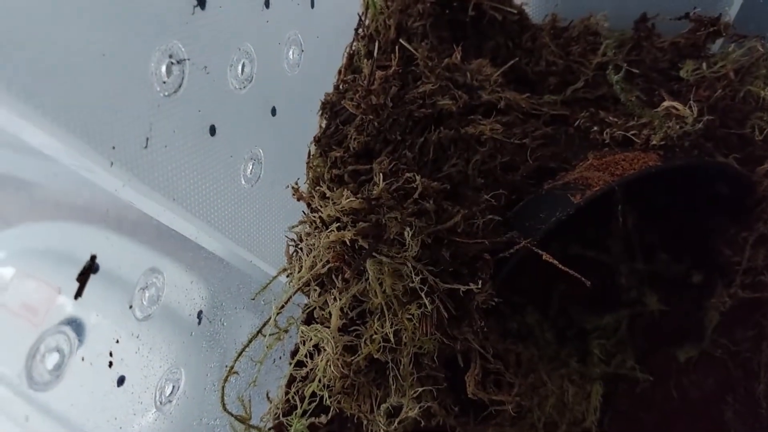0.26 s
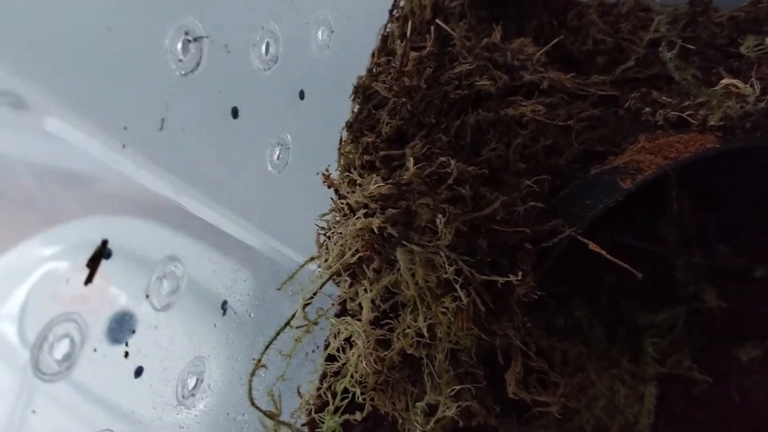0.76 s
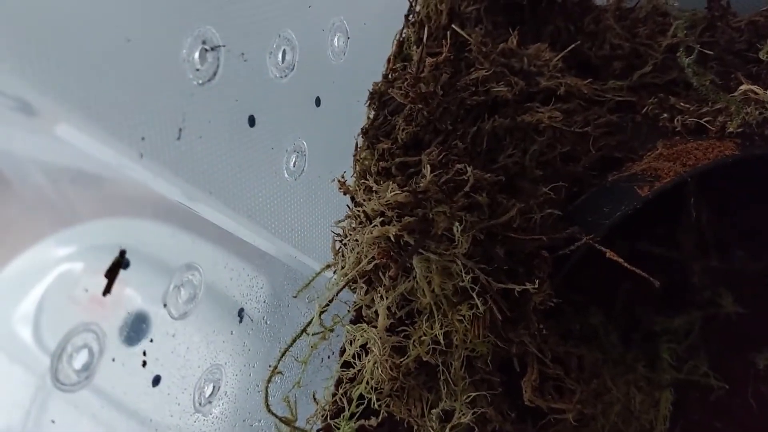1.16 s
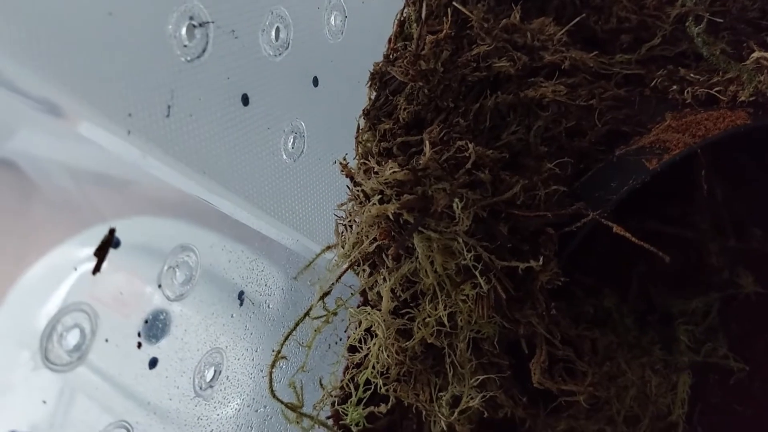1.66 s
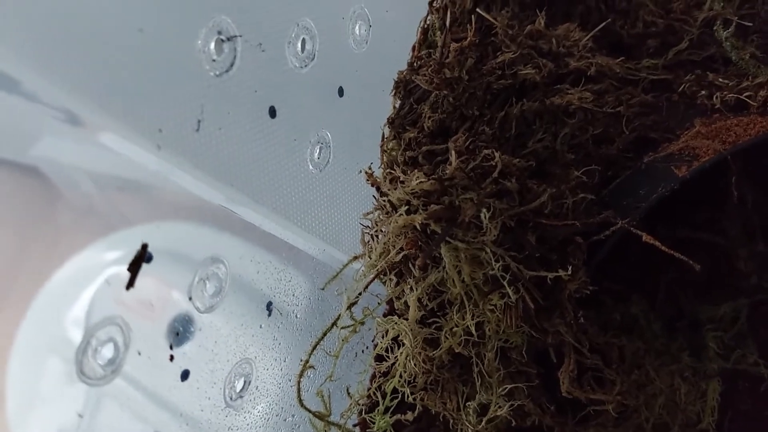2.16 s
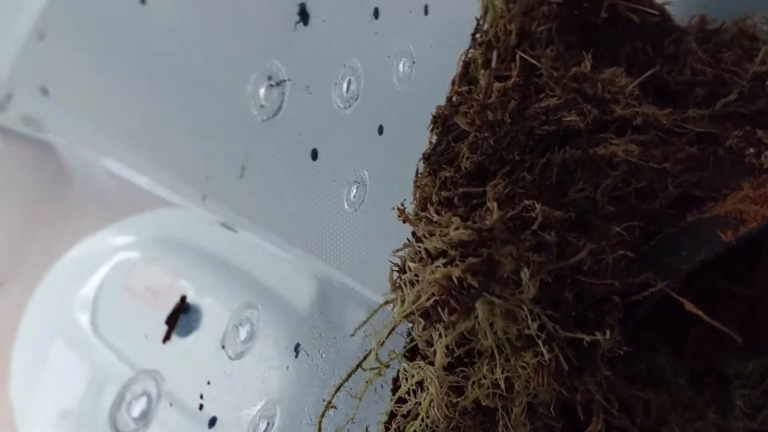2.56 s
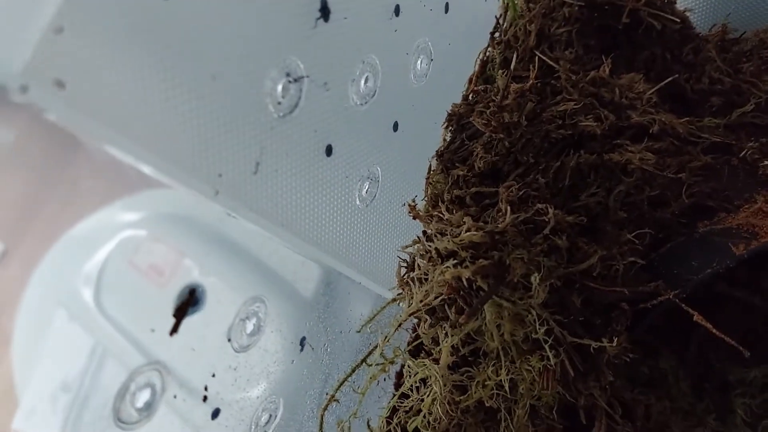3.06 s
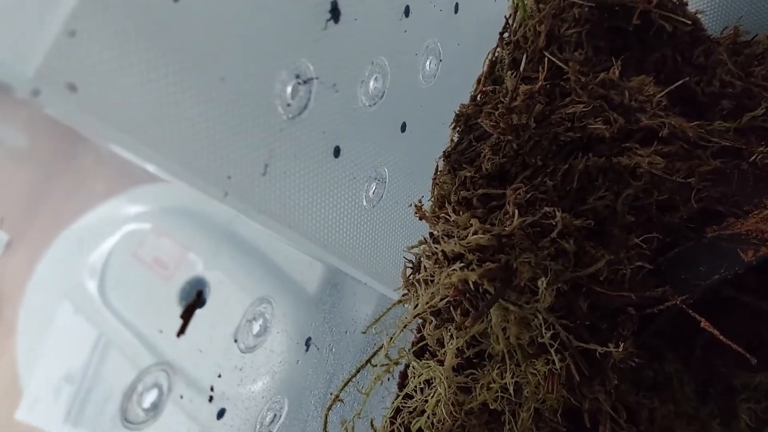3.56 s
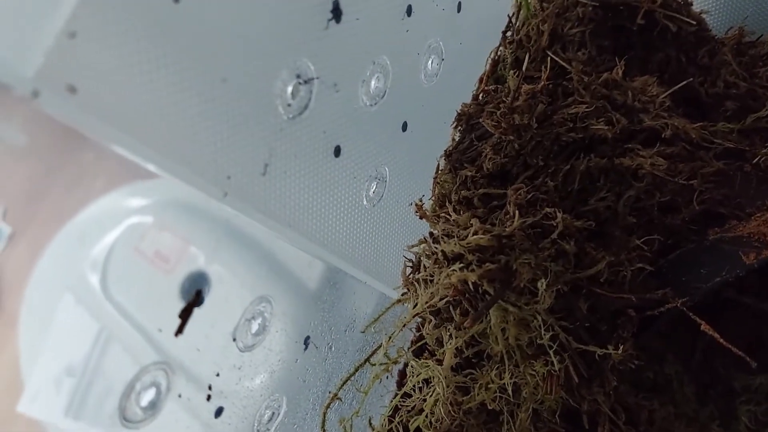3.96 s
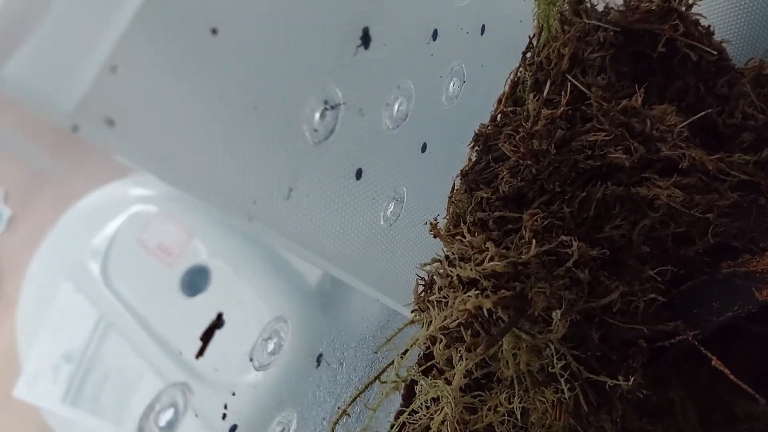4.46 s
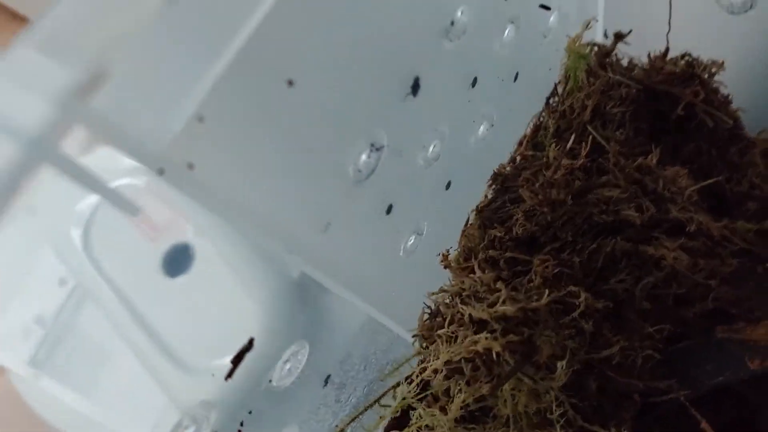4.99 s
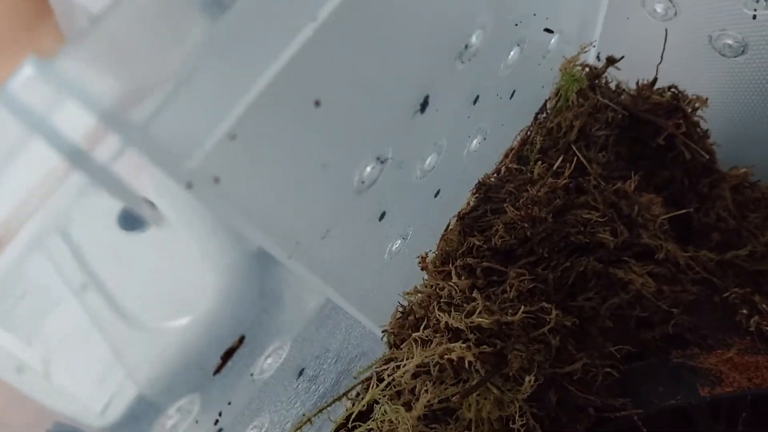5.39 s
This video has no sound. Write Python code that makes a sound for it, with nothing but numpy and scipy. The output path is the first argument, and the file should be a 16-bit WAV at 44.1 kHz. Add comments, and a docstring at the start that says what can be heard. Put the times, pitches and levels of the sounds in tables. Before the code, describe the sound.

A hand sprayer mists moss beside a close stereo microphone in a small plastic enclosure indoors. Short, breathy hisses repeat to the end, each edged by snappy spits, with a soft pump thump beneath. A brief stiff plastic rub and low knocks interrupt the first half; afterwards the spraying runs steadily, shifting from slightly right to left of centre, with patter fuller and the tub quiet.

```python
"""Quick, hissing pulls of a trigger bottle, nearly three a second, mist moss in a plastic tub close to the microphone.
Each pull spits, thumps in the pump, swells to a hiss of droplets, spits as the valve shuts and sucks water back.
Jet and droplets are shaped noise driven by pump pressure; pump, tub and a rubbed panel are struck modes.
The tub is bumped a few times and booms; its near walls comb the hiss, differently for each aim of the nozzle."""
import sys
import numpy as np
from scipy import signal
from scipy.fft import rfft, irfft
from scipy.io import wavfile

SR = 44100
rng = np.random.default_rng(int(sys.argv[2]) if len(sys.argv) > 2 else 0)


def int16_out(signal):
    """Quantize to a 16-bit WAV file."""
    q = np.round(np.clip(np.atleast_2d(signal).T, -1, 1) * 32767)
    wavfile.write(sys.argv[1], SR, q.astype(np.int16))


N = 248264
TIME = np.arange(N) / SR

# trigger pulls: (time [s], let go [s], mist level [dB], patter on the moss over the mist [dB],
#                 second spit level [dB], pump thump level [dB], hollow that the patter rings [Hz])
PULLS = [(0.0375, 0.26, -36, -2.5, -30, -52, 1327), (0.6229, .839, -35.5, -4.5, -29, -56, 1300),
         (1.081, 1.317, -35.5, -1.5, -32.5, -64, 2730), (1.474, 1.69, -33.5, -0.8, -25, -32, 2670),
         (1.826, 2.039, -35, 1, -43, -52, 2680), (2.1507, 2.3512, -35.5, -0.4, -42, -51.5, 2480),
         (2.7431, 2.9735, -35.5, 0, -29, -52, 2750), (3.108, 3.3186, -33.5, 3, -53, -40.5, 1960),
         (3.4465, 3.6626, -34, 2, -43.5, -39.5, 2510), (3.8148, 4.0283, -33.5, 1.5, -43, -39, 1960),
         (4.161, 4.3654, -33, 1, -43.5, -38, 2090), (4.4672, 4.668, -34, 0.2, -47, -40, 2300),
         (4.7968, 4.993, -35, -1.1, -57, -40, 2020), (5.1366, 5.3458, -35, 0.9, -29, -41.5, 1750),
         (5.613, 5.82, -37.5, -2.5, -47.5, -49, 2010)]
# aims of the nozzle: (start [s], left minus right [dB], hollow level [dB], closing spit level [dB],
#                      suction level [dB])
AIMS = [(0, -.5, -5.5, -36.5, -68), (2.6, 3, -10, -32.5, -59), (4.1, 3.5, -6.5, -31.5, -62.5)]


def undb(db):
    """Decibels to gain."""
    return 10 ** (np.asarray(db) / 20)


def pan(db):
    """Gains of the two channels for a left minus right level."""
    return undb(np.array([[db], [-db]]) / 2)


def add(out, s, sound):
    """Mix a sound in from time s."""
    start = max(int(s * SR), 0)
    part = sound[..., :max(N - start, 0)]
    out[:, start:start + part.shape[-1]] += part


def colour(x, points):
    """Filter by a (Hz, dB) spectrum, keeping the power of white noise."""
    hz, db = np.transpose(points)
    f = np.fft.rfftfreq(x.shape[-1], 1 / SR) + 1
    gain = undb(np.interp(np.log(f), np.log(hz), db))
    gain = gain * np.minimum(f / hz[0], 1) ** 2  # falls away under the first point
    return irfft(rfft(x) * gain / np.sqrt(np.mean(gain ** 2)), x.shape[-1])


def lowpass(x, hz, order=2):
    """The part of a sound under hz, without delay."""
    sos = signal.butter(order, min(hz, .45 * SR), fs=SR, output="sos")
    return signal.sosfiltfilt(sos, x)


def highpass(x, hz):
    """The part of a sound over hz."""
    return signal.sosfilt(signal.butter(2, hz, "highpass", fs=SR, output="sos"), x)


def resonate(x, hz, width_hz):
    """One resonance, gain 1 at its centre."""
    return signal.lfilter(*signal.iirpeak(hz, hz / width_hz, fs=SR), x)


def fade(t, t60):
    """Exponential decay by 60 dB in t60 seconds."""
    return np.exp(-np.log(1000) * t / t60)


def at_ports(pair, alike_hz):
    """Two unrelated sounds become left and right: alike in the bass, unrelated in the treble."""
    f = np.fft.rfftfreq(pair.shape[-1], 1 / SR)
    alike = 1 / (1 + f / alike_hz)
    mid, side = irfft(rfft(pair) * np.sqrt([1 + alike, 1 - alike]), pair.shape[-1])
    return np.array([mid + side, mid - side]) / np.sqrt(2)


def from_right(x):
    """A source on the right reaches the left port late."""
    port_lag_s = .00033
    t = TIME[:x.shape[-1]]
    return np.array([np.interp(t - port_lag_s, t, x[0]), x[1]])


def noise(points, size, alike_hz=900):
    """Stereo turbulence of a given spectrum."""
    return colour(at_ports(rng.standard_normal((2, size)), alike_hz), points)


def burst(points, rise_s, t60):
    """A puff of noise that rises linearly while it dies away."""
    t = TIME[:SR // 2]
    return noise(points, len(t)) * np.minimum(t / rise_s, 1) * fade(t, t60)


def ring(modes, contact_ms, build_cycles=0.76, lowest_hz=48):
    """Modes struck by a half-sine push; a longer contact is duller, and low modes take longer to build up."""
    t = TIME[:SR]
    push = np.sin(np.pi * np.minimum(t[:SR // 50] * 1000 / contact_ms, 1))
    body = np.zeros(len(t))
    for hz, db, t60 in modes:
        build = 1 - np.exp(-t * hz / build_cycles)
        body += undb(db) * np.sin(2 * np.pi * hz * t) * fade(t, t60) * build
    body = signal.fftconvolve(body, push / push.sum())[:SR]
    return highpass(body, lowest_hz)


def near_walls(x, walls):
    """Each port hears the sound with its own few very early reflections."""
    f = np.fft.rfftfreq(x.shape[-1], 1 / SR)
    walls = np.array(walls)
    lag_s, share = walls[:, 0::2, None] / 1000, walls[:, 1::2, None]
    comb = 1 + np.sum(share * np.exp(-2j * np.pi * f * lag_s), axis=0)
    return irfft(rfft(x) * comb, x.shape[-1])


def aim_at(s):
    """Which aim the nozzle has at time s."""
    return sum(s >= row[0] for row in AIMS[1:])


def spit(tail_db=-12, tail_t60=0.055):
    """A drop bursts from the nozzle: a sharp snap and a short fizz."""
    # spectrum: (frequency [Hz], level [dB])
    spit_spectrum = [(300, -13), (800, -7.5), (1400, -13.5), (2100, -8), (2400, -12.5), (2800, -4),
                     (3600, -11), (5500, -8.5), (7300, -8), (8600, -2), (11300, 5), (13000, 2.5),
                     (15500, 1.5), (16800, -9)]
    t = TIME[:SR // 10]
    decay = fade(t, t60=.016) + undb(tail_db) * fade(t, tail_t60)
    return noise(spit_spectrum, len(t)) * np.minimum(t / .002, 1) * decay


def quiet_room(level_db=-70.5):
    """Steady room noise, strongest in the bass."""
    # spectrum: (frequency [Hz], level [dB])
    room_spectrum = [(25, -11), (50, 5.5), (85, -2.5), (125, -0.5), (200, -12), (400, -18), (900, -23.5),
                     (2500, -24.5), (6000, -24.5), (9000, -23), (15500, -26.5)]
    return undb(level_db) * noise(room_spectrum, N, alike_hz=695)


def wet_moss(ticks_per_s=14, tick_db=-70, scatter_db=3):
    """Tiny ticks at random times as water settles in the moss."""
    out = np.zeros((2, N))
    times_s = np.cumsum(rng.exponential(1 / ticks_per_s, 100))
    for s, size in zip(times_s, rng.standard_normal(100)):
        add(out, s, undb(tick_db + scatter_db * size) * spit())
    return out


def rub(level_db=-46, slips_per_s=600, scatter_db=3, rustle_db=-8):
    """Something rubs along the wall: dense uneven slips ring a stiff panel, with a dry rustle."""
    # stiff panel modes: (frequency [Hz], level [dB], t60 [s])
    panel_modes = [(520, -2, 0.069), (602, -2, 0.059), (649, 1, 0.08), (1083, -11, 0.027),
                   (1223, -7.5, 0.059), (1650, -6, 0.027), (2410, -18, 0.0076)]
    # rustle spectrum: (frequency [Hz], level [dB])
    rustle_spectrum = [(400, 0), (1200, 4), (2500, -5), (4000, -11), (7000, -20.5), (15000, -23)]
    start_s, swell_s, hold_s, lift_t60, swell_db = .335, 0.16, 0.069, 0.12, 27.5
    slips = rng.random((2, N)) < slips_per_s / SR
    slips = slips * undb(scatter_db * rng.standard_normal((2, N)))
    slips = at_ports(slips - slips.mean(), alike_hz=2500)
    strike = ring(panel_modes, contact_ms=0.12, lowest_hz=350)
    panel = signal.fftconvolve(slips, strike[None], axes=1)[:, :N]
    sound = panel / panel.std() + undb(rustle_db) * noise(rustle_spectrum, N)
    # presses harder, holds and lifts off
    t = TIME - start_s
    swell = undb(swell_db * np.minimum(t / swell_s - 1, 0)) * (t > 0)
    lift = fade(np.maximum(t - swell_s - hold_s, 0), lift_t60)
    return from_right(sound) * undb(level_db) * swell * lift


def tub(rattle_db=-13):
    """Each bump booms in the thin walls, with a dull crack and a short rustle; the bottle in the hand ticks."""
    # bumps: (time [s], blow level [dB], contact time [ms], crack level [dB])
    bumps = [(.338, -25.5, 3.24, -44), (.353, -24.5, 5.7, -72), (.423, -31, 1.2, -73),
             (.440, -27.5, 1.9, -60.5), (0.477, -25.5, 2.7, -50), (0.49, -22.5, 2.6, -62),
             (0.525, -25, .7, -38), (1.386, -13, 4.43, -30), (1.446, -16.5, 3.24, -50.5),
             (1.48, -7.5, 4.9, -26.5), (1.517, -27, 2.2, -58.5), (1.584, -25.5, 2.9, -71),
             (1.676, -41.5, 3.2, -68), (2.391, -19.5, 2.8, -32), (2.405, -15, 6.4, -60),
             (2.441, -25.5, 4.5, -46), (2.485, -26.5, 3.7, -59)]
    # wall modes: (frequency [Hz], level [dB], t60 [s])
    wall_modes = [(62.7, -1, 0.17), (94.4, 4, 0.075), (117.8, 0.5, 0.13), (136.1, 2, 0.16),
                  (168.5, 0, 0.069), (222.3, -1, 0.11), (242.3, -3.5, 0.17), (307, -11, 0.14),
                  (397, -20.5, 0.17), (548, -12.5, 0.082), (698, -21, 0.21)]
    # small plastic ticks from the bottle: (time [s], level [dB], t60 [s])
    bottle_ticks = [(.019, -69, 0.013), (1.0, -59, 0.01), (2.585, -57, 0.012), (2.65, -46.5, 0.1),
                    (2.66, -49, 0.055), (2.70, -66.5, 0.33)]
    # spectra: (frequency [Hz], level [dB])
    crack_spectrum = [(150, 8), (600, -3.5), (1000, -11), (2000, -14), (3500, -21), (6000, -28.5),
                      (15000, -40.5)]
    tick_spectrum = [(300, -29), (1200, -11.5), (2500, -2), (4000, 2.5), (7000, -10.5), (11000, -11),
                     (15500, -19)]
    out = np.zeros((2, N))
    for s, db, contact_ms, crack_db in bumps:
        lowest_hz = np.interp(db, [-26, -20], [80, 48])  # only a hard blow bends the whole wall
        add(out, s, undb(db) * ring(wall_modes, contact_ms, lowest_hz=lowest_hz))
        crack = burst(crack_spectrum, rise_s=0.001, t60=0.055)
        rustle = burst(crack_spectrum, rise_s=0.0049, t60=0.42)
        add(out, s, undb(crack_db) * (crack + undb(rattle_db) * rustle))
    boom = lowpass(out, hz=100)
    out = from_right(boom * pan(db=-5.0) + (out - boom) * pan(db=-2.5))
    for s, db, t60 in bottle_ticks:
        add(out, s, undb(db) * burst(tick_spectrum, rise_s=0.00061, t60=t60))
    return out


def pump(rebound_s=0.025, rebound_db=-7, flow_db=-16):
    """The piston meets the water and rebounds; the bottle hums on while the water flows."""
    # pump and bottle modes: (frequency [Hz], level [dB], t60 [s])
    pump_modes = [(143.3, -9, 0.36), (174.3, -6.5, 0.28), (219, 1, 0.16), (244.2, -1, 0.15),
                  (299.4, -28, 0.066), (520, -14.5, 0.086), (733, -7, 0.067)]
    # hum: (frequency [Hz], level [dB])
    flow_spectrum = [(110, -3.0), (140, 9.0), (180, -2), (235, -1.5), (330, -10.0), (600, -43.5),
                     (3000, -79.5)]
    out, t = np.zeros((2, N)), TIME[:SR // 2]
    thump = ring(pump_modes, contact_ms=0.89, lowest_hz=113) * pan(db=-5.5)
    for s, _, mist_db, _, _, thump_db, _ in PULLS:
        add(out, s + 0.0025, undb(thump_db) * thump)
        add(out, s + rebound_s, undb(thump_db + rebound_db) * thump)
        flow = noise(flow_spectrum, len(t), alike_hz=1542)
        flow = flow * np.minimum(t / 0.012, 1) * fade(t, t60=0.63)
        add(out, s, undb(mist_db + flow_db) * flow)
    return out


def nozzle(open_db=6, again_s=0.0075, wheeze_hz=2200, wheeze_db=9):
    """At low pressure the nozzle spits twice as the valve opens, once as it shuts; the pump refills with a wheeze."""
    # spectrum: (frequency [Hz], level [dB])
    suction_spectrum = [(300, 11), (800, -2), (1500, -1), (2100, 6.5), (2450, 5), (2850, 9.5), (3800, 6),
                        (7000, -3.5), (11000, -1), (15500, -11)]
    out = np.zeros((2, N))
    for s, let_go_s, mist_db, _, second_db, *_ in PULLS:
        *_, shut_db, suck_db = AIMS[aim_at(s)]
        gap_s = again_s * rng.uniform(.8, 1.2)
        add(out, s, undb(mist_db + open_db) * spit())
        add(out, s + gap_s, undb(second_db) * spit() * pan(db=-1.5))
        last = spit()
        thin = last - 0.66 * lowpass(last, hz=1525)  # the last drop has little body
        add(out, let_go_s, undb(shut_db) * thin * pan(db=1.0))
        suck = burst(suction_spectrum, rise_s=0.022, t60=0.18)
        pitch_hz = wheeze_hz * (1 + .03 * rng.standard_normal())
        suck = suck + undb(wheeze_db) * resonate(suck, pitch_hz, width_hz=150)
        add(out, let_go_s + 0.0057, undb(suck_db) * suck * pan(db=2.5))
    return out


def pressure(t, stroke_s, opening_db=-12, opening_s=.006, late_peak=1.108, arch_power=1.34, bleed_t60=.11):
    """The valve opens at a low pressure; the finger adds one smooth arch, and what is left bleeds away."""
    stroke = np.minimum(t / stroke_s, 1) ** late_peak
    arch = np.abs(np.sin(np.pi * stroke)) ** arch_power
    bleed = fade(np.maximum(t - stroke_s, 0), bleed_t60)
    return arch + undb(opening_db) * np.minimum(t / opening_s, 1) * bleed


def mist(droplet_db=-6, droplets_per_s=5000, flutter_db=0.97, split_hz=5000, patter_bend=1.18,
         patter_pan_share=.7, ease_off_s=0.048):
    """The jet hisses and its droplets patter on the moss; both follow the pressure in the pump."""
    # spectrum: (frequency [Hz], level [dB])
    mist_spectrum = [(150, -15), (500.0, -9), (750.0, -8), (1100.0, -5.5), (1600.0, -3), (2200.0, -3),
                     (2800.0, -0.26), (3400.0, -2.5), (4200.0, -4.5), (5300.0, -2), (7000.0, -4),
                     (9500.0, -3), (13000.0, 1), (15600.0, 0.4)]
    # near walls for each aim: (left lag [ms], left share, right lag [ms], right share)
    first_walls = [(0.08, -0.085, 0.1, -0.17), (1, 0.11, 0.095, 0.2), (1, 0.2, 0.22, 0.093)]
    second_walls = [(0.13, 0.062, 0.254, 0.18), (0.25, -0.17, 0.076, 0.094), (0.485, -0.08, 0.415, 0.08)]
    third_walls = [(0.257, -0.19, 0.233, 0.28), (0.1, 0.14, 0.07, 0.21), (0.087, -0.12, 0.508, 0.25)]
    walls = first_walls, second_walls, third_walls
    out, t = np.zeros((2, N)), TIME[:2 ** 14]
    for s, let_go_s, db, moss_db, _, _, hollow_hz in PULLS:
        aim = aim_at(s)
        _, pan_db, hollow_db, *_ = AIMS[aim]
        jet, sizes, wobble = rng.standard_normal((3, 2, len(t)))
        drops = sizes * (rng.random(jet.shape) < droplets_per_s / SR)
        drops = drops * np.sqrt(SR / droplets_per_s)  # same power as the jet
        spray = (jet + undb(droplet_db) * drops) / np.hypot(1, undb(droplet_db))
        spray = colour(at_ports(spray, alike_hz=1300), mist_spectrum)
        spray = near_walls(spray, walls[aim])
        if aim == 0:  # the first pulls land to the right
            spray = from_right(spray)
        # the far walls add a finer ripple, new for each pull
        far_walls = rng.uniform([1, .1, 1, .1], [5, .22, 5, .22], (4, 4))
        spray = near_walls(spray, far_walls)
        spray = spray + undb(hollow_db) * resonate(spray, hollow_hz, width_hz=250)
        wobble = lowpass(wobble[0], hz=90)
        # the finger eases off before the trigger is let go
        drive = pressure(t, let_go_s - s - ease_off_s)
        drive = drive * undb(flutter_db * wobble / wobble.std())
        patter = lowpass(spray, split_hz)
        hiss = spray - patter
        # the patter needs fast droplets, so it swells more steeply than the hiss
        patter = patter * drive ** patter_bend * pan(patter_pan_share * pan_db)
        add(out, s, undb(db + moss_db) * patter)
        add(out, s, undb(db) * hiss * drive * pan(pan_db))
    return out


def reflections(x, wet_db=-14, t60=0.0128, room_db=-36, room_t60=0.63, room_hz=4000, lowest_hz=300):
    """Dense short echoes inside the tub and a faint, duller tail from the room."""
    t = TIME[:SR // 2]
    pairs = rng.standard_normal((2, 2, len(t)))
    inside, room = (at_ports(pair, alike_hz=1200) * (t > .002) for pair in pairs)
    inside = inside * fade(t, t60)
    inside = inside - lowpass(inside, lowest_hz)  # long waves pass through the thin walls
    room = lowpass(room, room_hz) * fade(t, room_t60)
    tail = undb(wet_db) * inside / np.linalg.norm(inside[0])
    tail = tail + undb(room_db) * room / np.linalg.norm(room[0])
    return x + signal.fftconvolve(x, tail, axes=1)[:, :N]


def scene():
    """Bottle and tub over the quiet room."""
    sources = wet_moss() + rub() + tub() + pump() + nozzle() + mist()
    return quiet_room() + reflections(sources)


def record(dry):
    """The recorder cuts the top."""
    top_hz = 15700
    return signal.sosfilt(signal.ellip(10, .2, 70, top_hz, fs=SR, output="sos"), dry)


dry = scene()
out = record(dry)
int16_out(out)
```